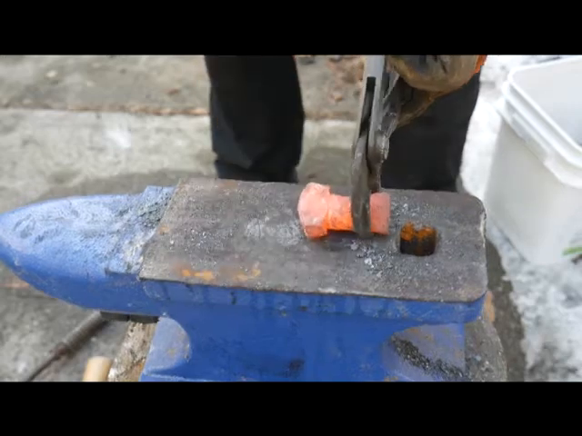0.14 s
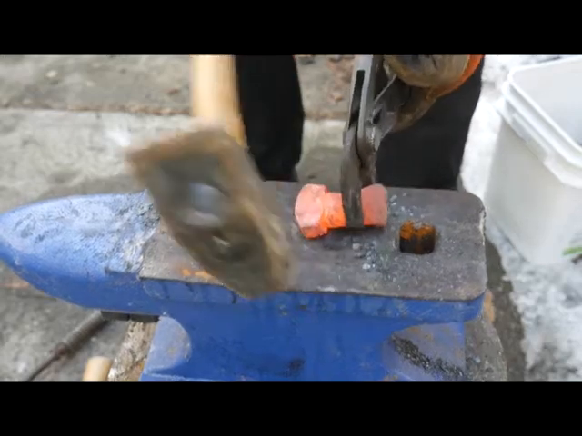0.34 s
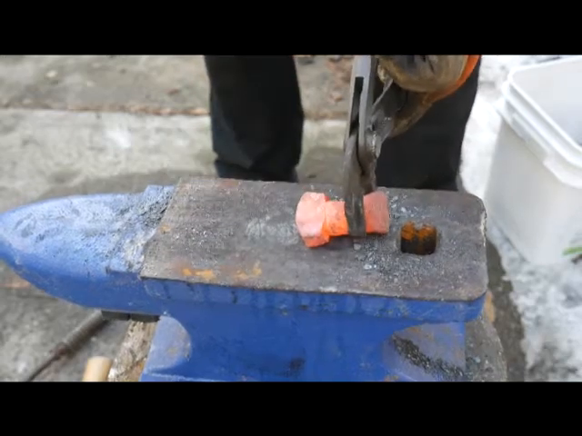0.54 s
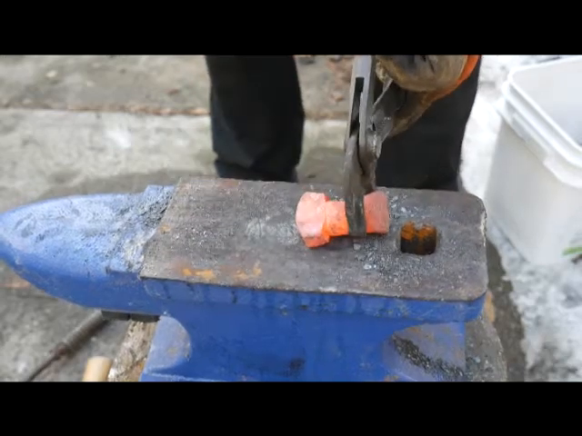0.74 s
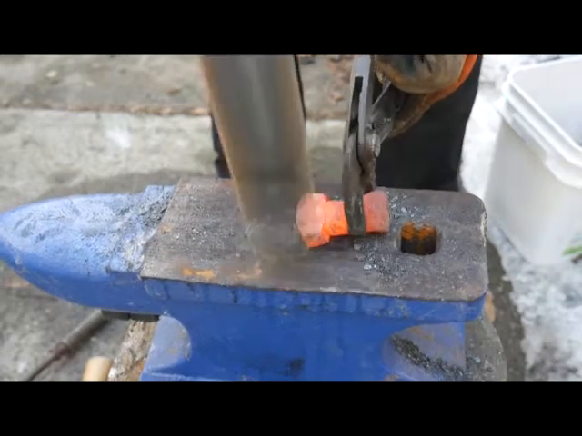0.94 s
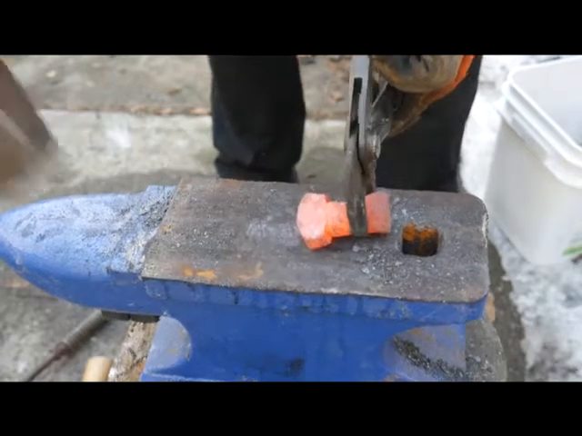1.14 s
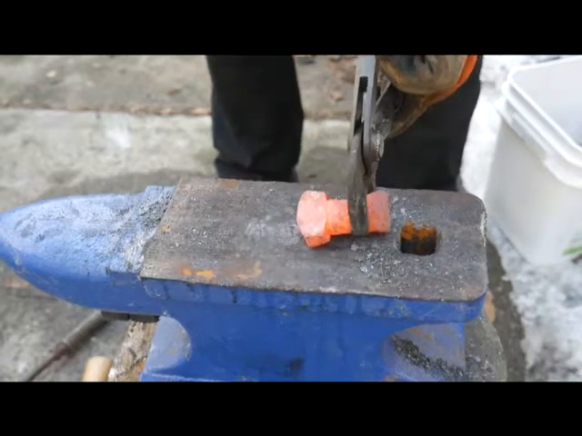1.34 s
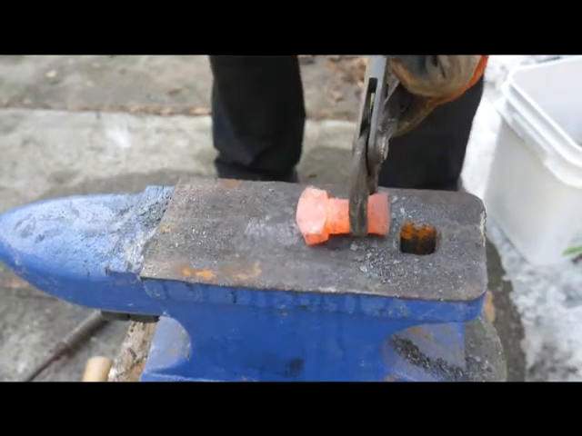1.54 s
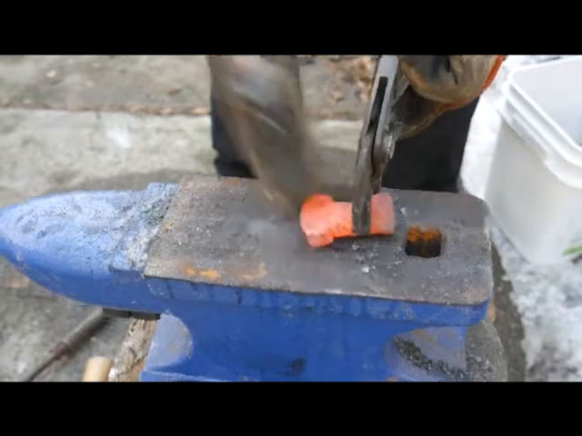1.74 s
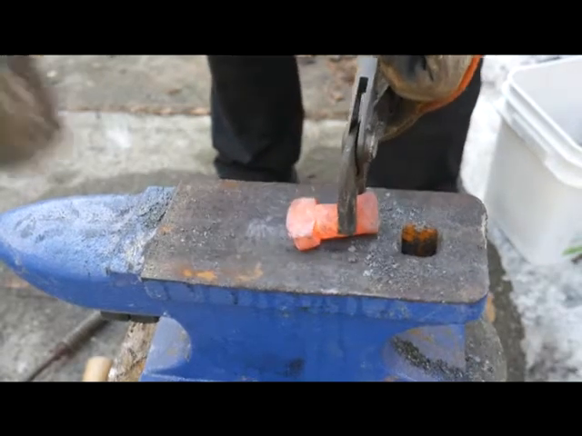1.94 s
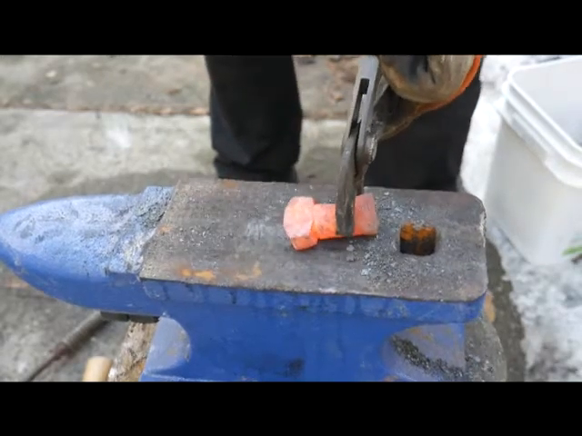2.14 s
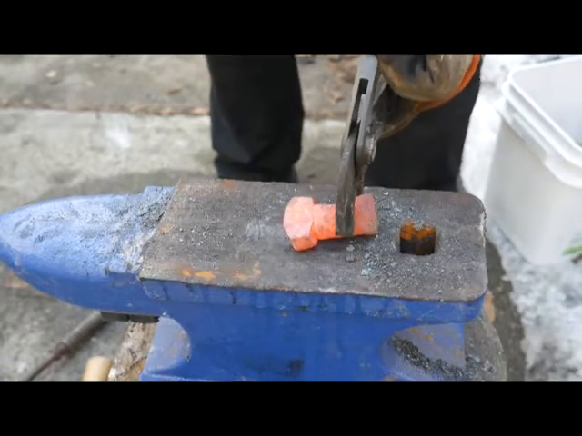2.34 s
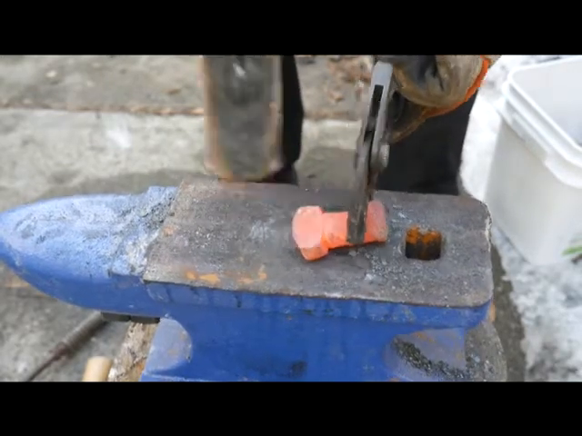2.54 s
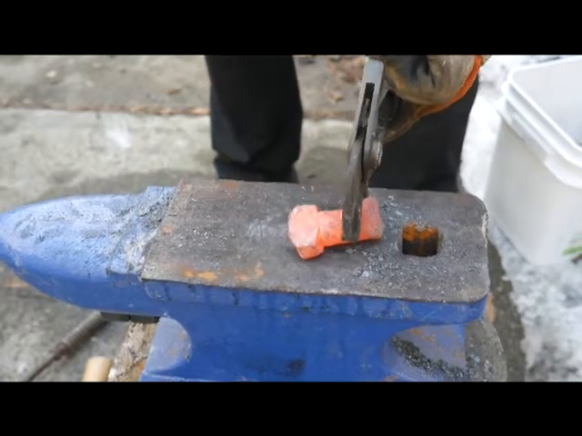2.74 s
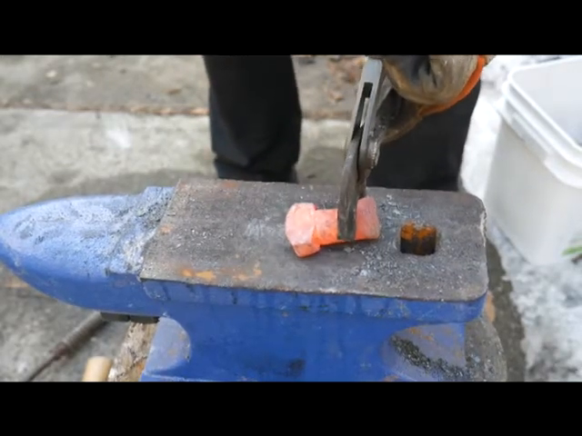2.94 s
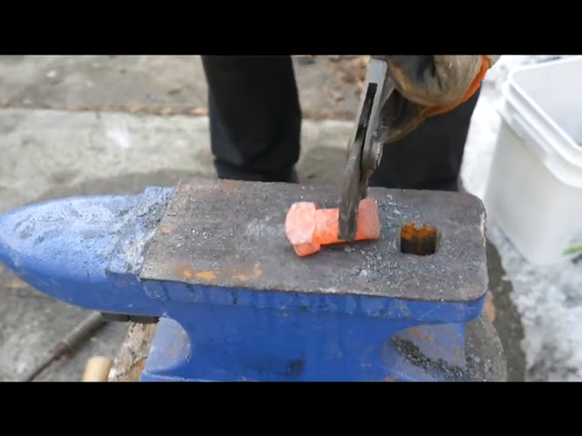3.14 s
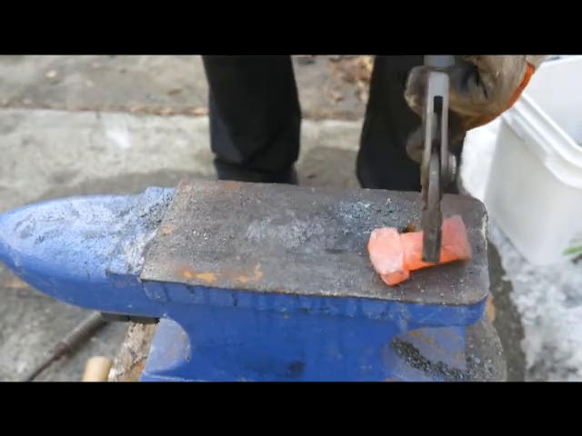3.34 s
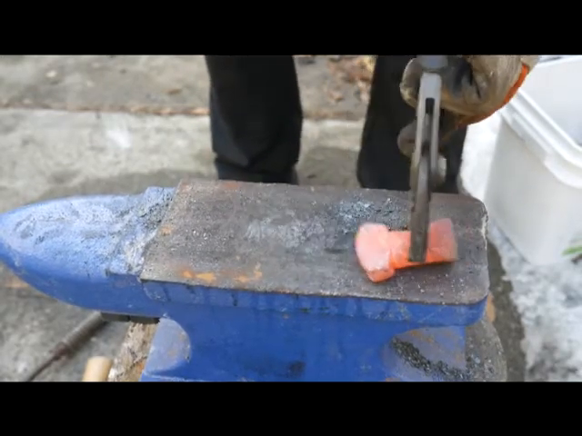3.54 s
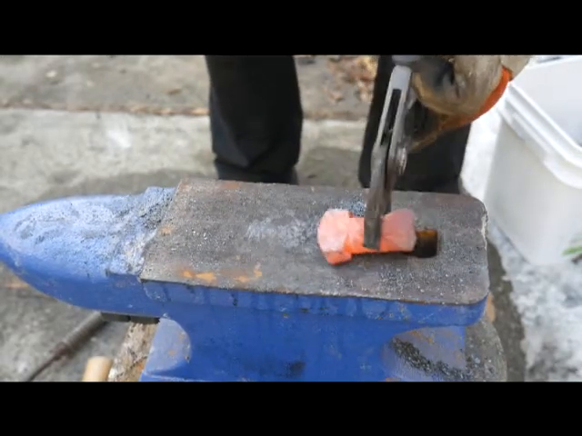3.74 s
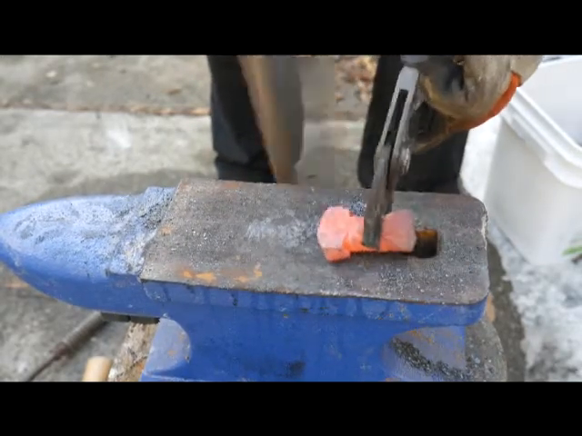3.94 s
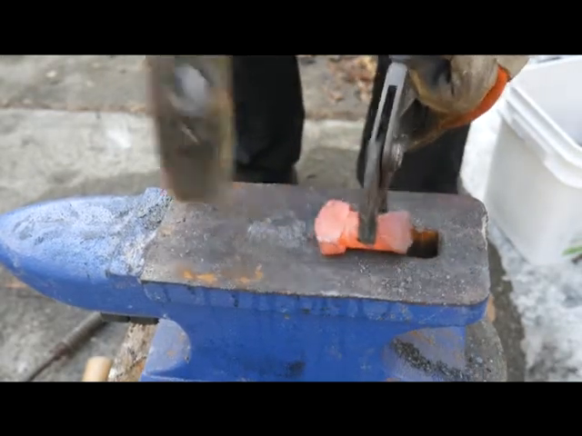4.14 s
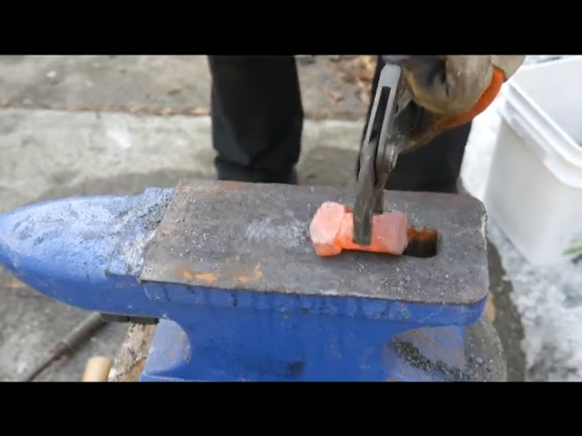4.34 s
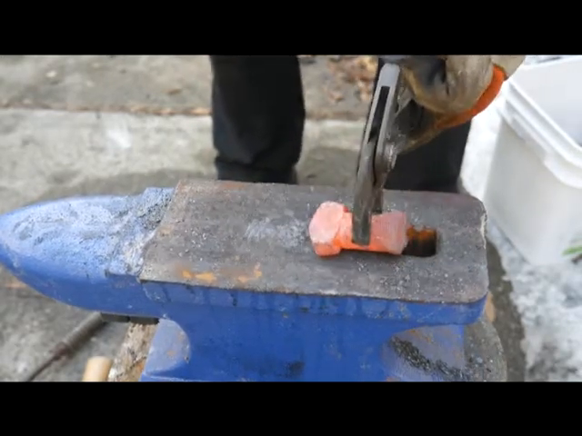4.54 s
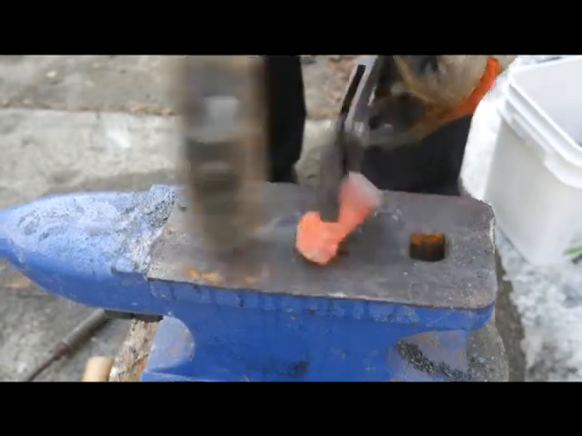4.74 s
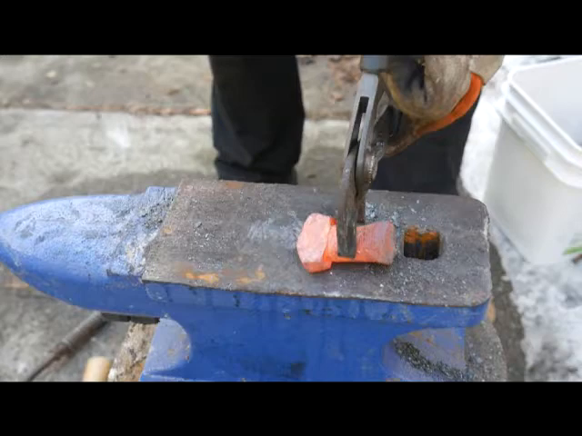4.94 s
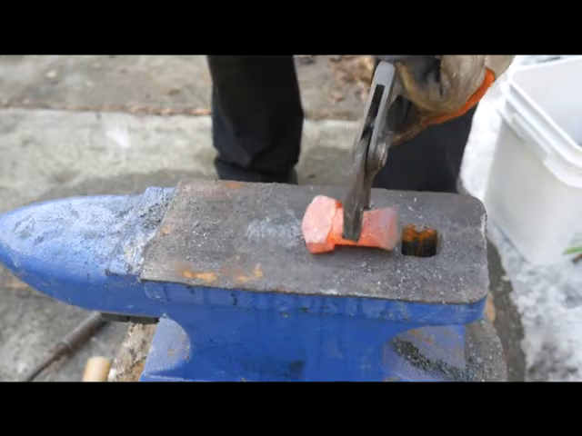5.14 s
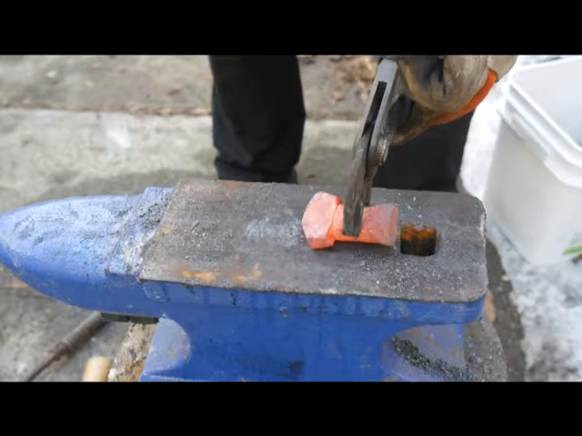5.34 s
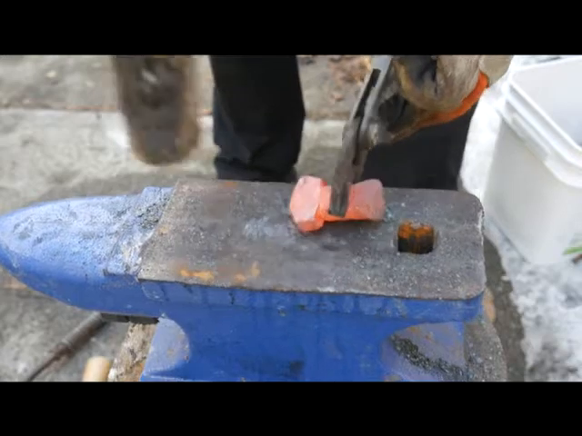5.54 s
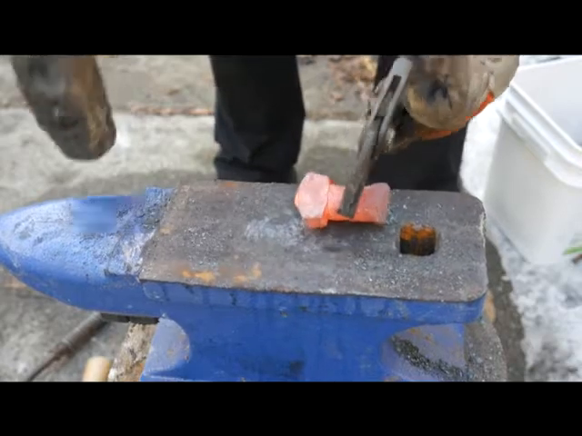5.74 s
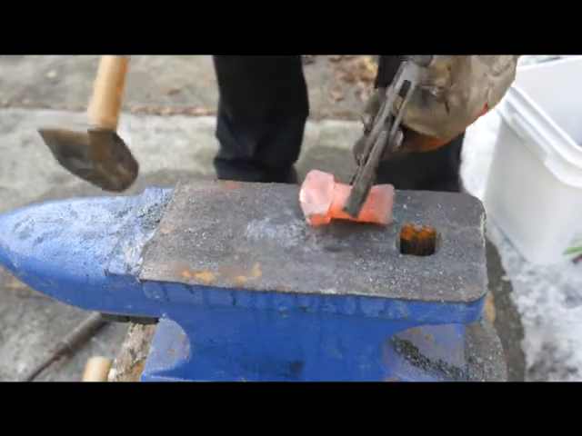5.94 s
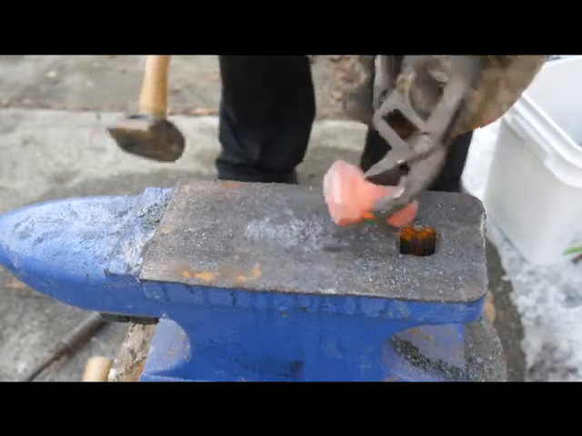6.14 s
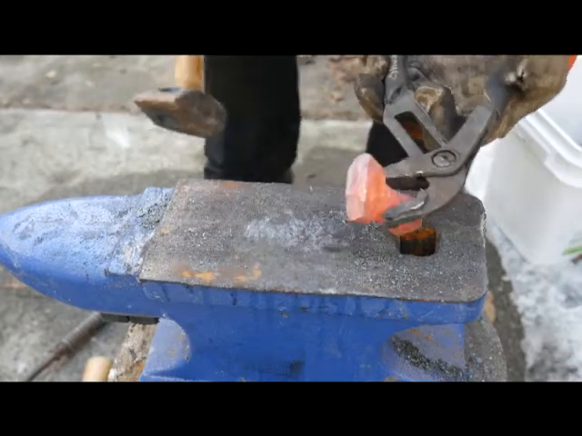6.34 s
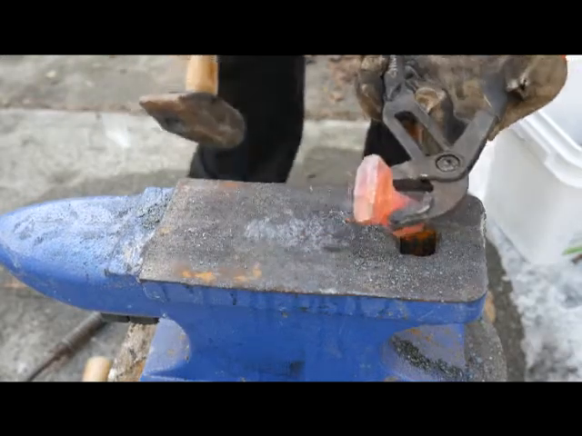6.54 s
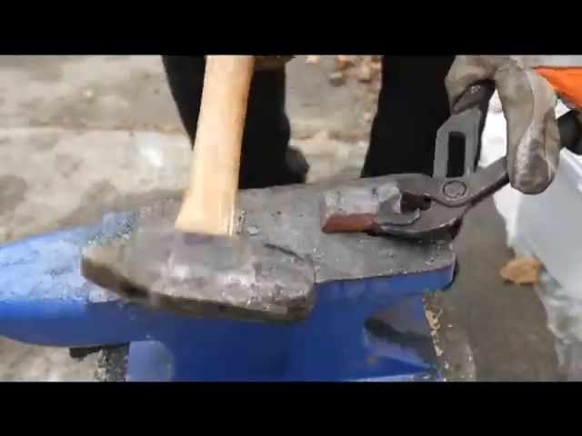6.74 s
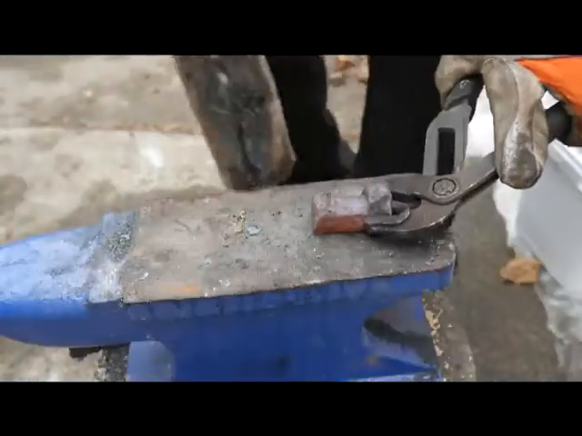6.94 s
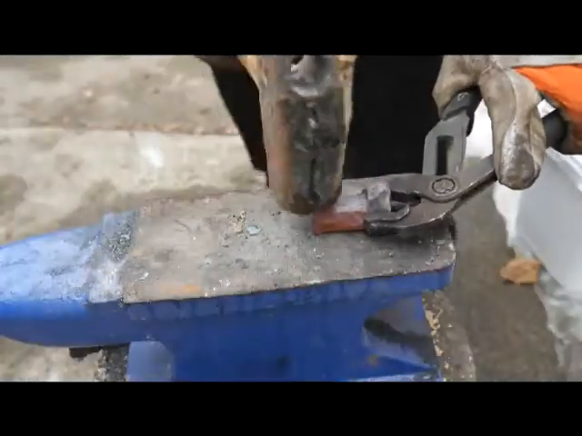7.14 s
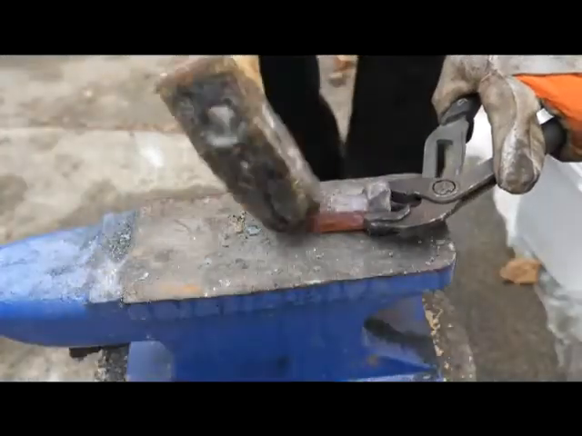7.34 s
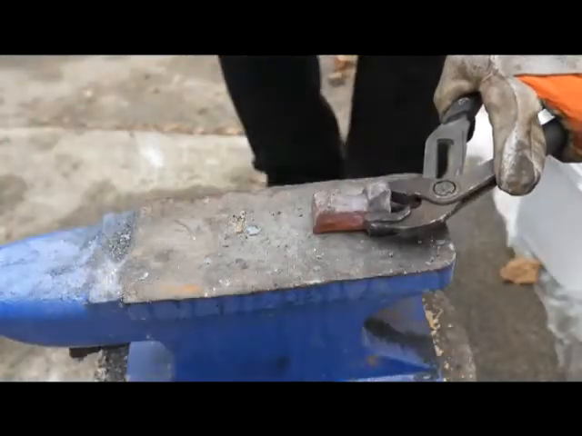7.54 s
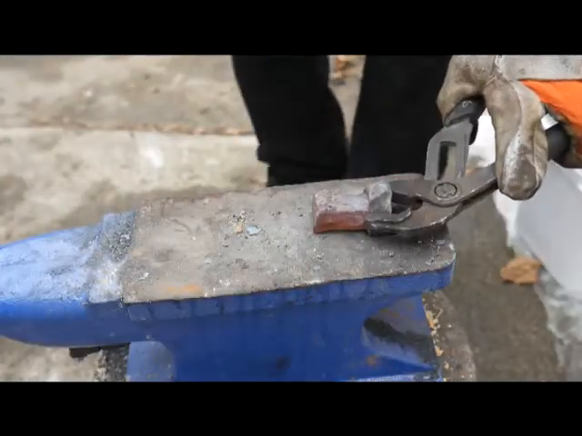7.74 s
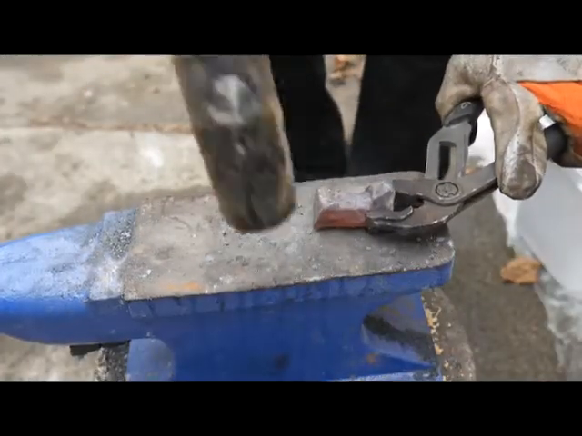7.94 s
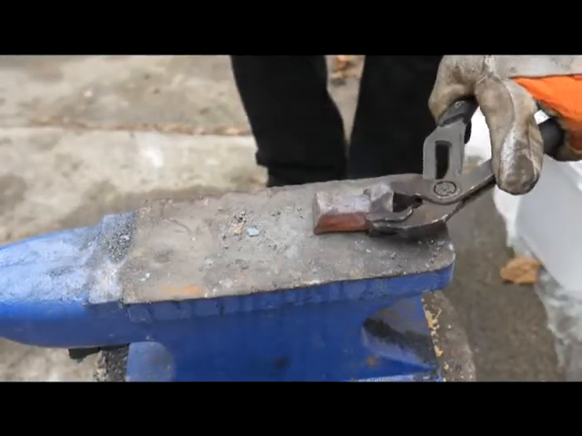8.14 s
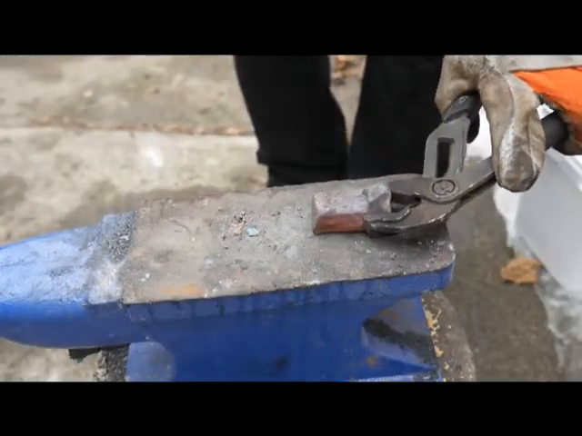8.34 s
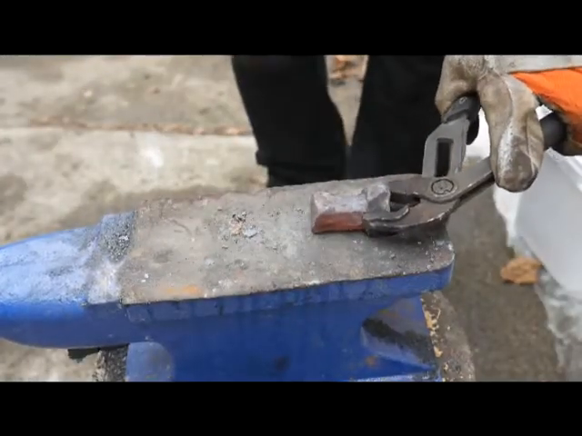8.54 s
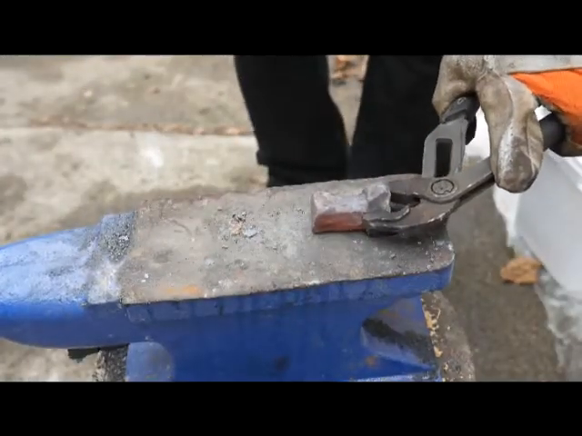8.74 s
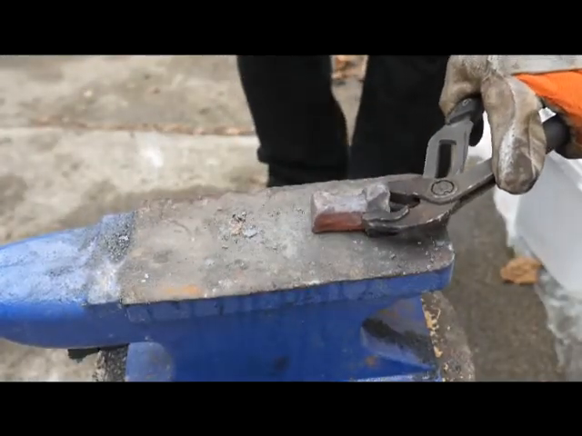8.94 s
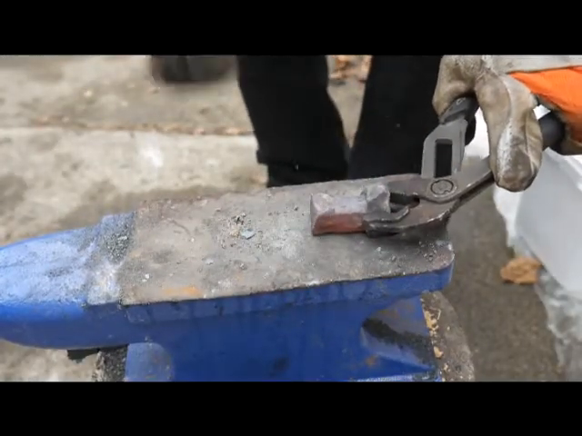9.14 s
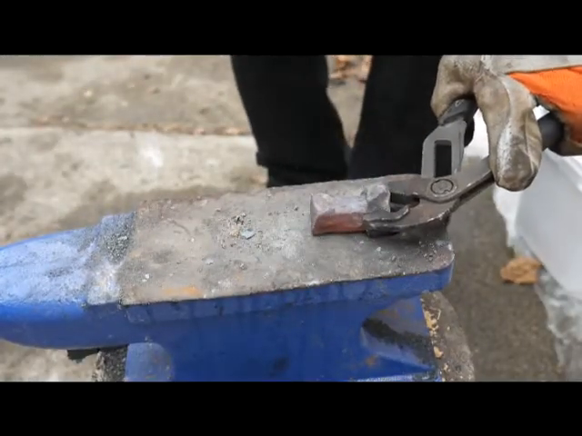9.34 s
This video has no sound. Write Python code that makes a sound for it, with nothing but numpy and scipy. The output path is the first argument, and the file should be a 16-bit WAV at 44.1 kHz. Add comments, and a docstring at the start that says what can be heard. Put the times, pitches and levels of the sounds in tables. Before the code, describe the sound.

Close, distorted hammering on a steel anvil in an open yard: evenly spaced punchy whacks with damped metallic clank over a barely audible rumble. After a quiet pause with small flake ticks and a faint tong squeak, the background jumps to a humming burner roar; metal scrapes and knocks, then three heavier, dull thuds briefly push the roar down.

```python
"""Hot bolt upset on an anvil

A smith upsets a red-hot bolt, held in tongs, on a steel anvil outdoors; the microphone is close and overloads.
Each blow sums a noise crack, a dispersed falling thud, short damped steel modes and a brief echo of the yard.
Tools knock, tick and scrape on the face: small cracks, filtered hiss and wandering narrow resonances. The
forge, shaped noise, rumbles behind; at 6.575 s the scene changes, and for the last, duller blows on the cooled
bolt the forge is much louder and hums."""
import sys
import numpy as np
from scipy import signal
from scipy.fft import rfft, irfft
from scipy.io import wavfile
from scipy.ndimage import uniform_filter1d, minimum_filter1d

SR = 44100
rng = np.random.default_rng(int(sys.argv[2]) if len(sys.argv) > 2 else 0)


def transcribe(u):
    """Save the signal u as a 16-bit wav file named by the first command-line argument.

    u: samples, shape (n,) or (channels, n), limited to [-1, 1]; the rate is SR.
    q: integer samples, one column per channel.
    """
    v = np.clip(np.atleast_2d(u).T, -1, 1)
    q = np.round(v * 32767).astype(np.int16)
    wavfile.write(sys.argv[1], SR, q)


N = 414540
TIME = np.arange(N) / SR

# Hammer blows, levels ahead of the limiter: t/s, thud/dB, thud tilt/(dB/octave), low knock/dB, punch/dB,
#   crack/dB, crack tilt/(dB/octave), anvil's lower tone/dB, main tone/dB, overtones/dB,
#   hammer ring/dB, its tilt/(dB/octave), ping/dB, bolt ring/dB, echo/dB, its tilt/(dB/octave)
BLOWS = [ (0.2011, 3.5, 3, -0.5, 3, -6, -1.5, -26, -29.5, -48, -45.5, 0, -41, -34.5, -20, -1.4),
         (0.914, 2, 2.5, 1, 2.5, -6.5, -0.5, -29, -36.5, -46, -49, 5, -22, -30, -21, -1),
         (1.6955, -5.5, -3.5, -8.5, -0.5, -3, 3.5, -45, -35, -50.5, -54.5, 4, -36.5, -29, -25, 0.6),
         (2.4450, -1, 4.5, 0, -1.5, -5, 2, -44.5, -28.5, -44, -46.5, 7, -41, -26, -21, 0),
         (3.184, -3.5, 3, -6.5, 2.5, 1.5, -2.5, -27, -26, -32, -50, 3.5, -39.5, -24, -21, 0.8),
         (3.9249, -3, 1, -2, -0.5, -7, 0.8, -33, -42.5, -46.5, -39.5, 3, -38.5, -27.5, -20.5, -0.2),
         (4.6727, 1, 0.5, -0.5, 3.5, -10.5, -3.5, -26.5, -31.5, -49.5, -43, -2.5, -28.5, -33, -18.5, -1.3),
         (5.3720, -1.5, -0.5, -1, -2, 0.5, -2, -29, -21, -32.5, -46.5, -1, -32.5, -23, -19.5, -0.4),
         (7.7957, 4, -0.5, 2, 0.5, -2, -6, -41.5, -42, -48, -41, -1.5, -41, -28, -21.5, -1.5),
         (8.3343, 1, -3.5, 1, 0.5, -11.5, 6, -43, -42, -55, -39, 2, -41, -23.5, -19.5, -1.2),
         (8.9328, 1.5, -2.5, 2, -2, -18.5, 7.5, -43, -42, -52, -49, 0, -47, -26, -20, -0.8), ]
# Modes around the anvil's main tone: f/Hz, level/dB, t60/s, after-ring level/dB
ANVIL_MODES = [(2010, -7, 0.11, -36), (2050, 2.5, 0.13, -28.5), (2160, -14.5, 0.06, -50),
               (2320, -12, 0.09, -46), (1050, -3, 0.04, -49.5)]
# Modes of the hammer head: f/Hz, level/dB, t60/s, after-ring level/dB
HAMMER_HEAD_MODES = [(3470, 1.5, 0.14, -18.5), (3300, -7.5, .12, -31), (4950, -6, .08, -38),
                     (5402, -0.5, 0.13, -25), (5600, -5, 0.12, -29), (6860, -8, .11, -34.5),
                     (8640, 1.5, 0.15, -27.5)]
# Chatter resonances of sliding steel: f/Hz, width/Hz, level/dB
CHATTER_BANDS = [(1300, 210, -1), (1726, 300, 6), (2250, 450, 2.5), (2950, 580, 3)]


def undb(db):
    """Amplitude ratio of a level: a factor of ten for every 20 dB."""
    return 10 ** (np.asarray(db) / 20)


def unit(x):
    """Normalization of the mean power: rms 1."""
    return x / np.sqrt(np.mean(x ** 2))


def fade(t, t60):
    """Exponential decay of a damped system, 60 dB down after t60 seconds."""
    return np.exp(-np.log(1000) * t / t60)


def curve(rows):
    """Linear interpolation of (t/s, value) rows over the whole scene."""
    return np.interp(TIME, *np.transpose(rows))


def response(points, size, tilt_db=0):
    """Frequency response: (f/Hz, level/dB) points joined over log frequency, tilted in dB/octave about 1 kHz."""
    hz = np.maximum(np.arange(size // 2 + 1) * SR / size, 1)
    at, db = np.transpose(points)
    octave = np.log2(np.clip(hz, 250, None) / 1000)  # the tilt stops growing below 250 Hz
    return hz, undb(np.interp(np.log(hz), np.log(at), db) + tilt_db * octave)


def noise(points, size, side_db, tilt_db=0, peaks_db=0, spacing_hz=150):
    """Spectral shaping of stereo noise to rms 1, with a random comb of small resonances and wider deepest bass."""
    hz, gain = response(points, size, tilt_db)
    comb = rng.standard_normal(1024)
    gain = gain * undb(peaks_db * np.interp(hz / spacing_hz, np.arange(len(comb)), comb))
    mid, side = rfft(rng.standard_normal((2, size))) * gain
    side = side * (undb(side_db) + .6 / (1 + (hz / 80) ** 4))
    return unit(irfft([mid + side, mid - side], size))


def walk(rate):
    """Low-pass random process: smoothed random steps, rate per second, with rms near 1."""
    hold = int(SR / rate)
    steps = np.repeat(rng.standard_normal(N // hold + 1), hold)
    return unit(uniform_filter1d(steps, hold)[:N])


def add(out, s, sound):
    """Superposition: mix a sound into out at time s."""
    i = int(s * SR)
    out[:, i:i + sound.shape[-1]] += sound[..., :N - i]


def dips(depth_db, recovery_s, onset_s=0.025):
    """Gain modulation in dB: a background drops after each blow and swells back."""
    age = np.maximum(TIME - np.array(BLOWS)[:, :1], 0)
    onset = 1 - np.exp(-age / onset_s)
    recovery = np.exp(-(age / recovery_s) ** 2)
    return depth_db * np.sum(onset * recovery, axis=0)


def forge(hum_hz=210, hum_db=-2.5, waver_hz=1.23):
    """Turbulent combustion noise; when it roars, the burner also sings one slightly wavering note."""
    # Spectra of the distant and the close forge: f/Hz, level/dB
    far_spectrum = [(15, -64), (25, -41.5), (125, -12), (146, -13.5), (167, -7), (196, -9.5), (224, -4),
                    (318, -2), (501, -11), (621, -5.5), (790, -19), (879, -16), (1810, -29), (11200, -50),
                    (15000, -72.5)]
    near_spectrum = [(25, -37.5), (60, -27), (110, -14.5), (170, -10.5), (250, 0), (330, 2), (420, -4.5),
                     (510, -6), (620, -5.5), (930, -16.5), (2100, -24.5), (4500, -37), (8000, -43),
                     (10200, -42.5), (15000, -59)]
    # Levels of the distant rumble and the close roar, before the dips: t/s, level/dB
    rumble_levels = [(0, -43), (2.5, -46), (5.9, -44.5), (6.55, -40)]
    roar_levels = [(6.57, -26.5), (7.8, -27), (8.5, -29), (9.4, -33)]
    # Dips of each after a blow: depth/dB, recovery/s
    rumble_dip = (-7.5, 0.32)
    roar_dip = (-23.5, 0.22)
    roar_start_s, crossfade_s = 6.575, 0.0031

    loud = np.clip((TIME - roar_start_s) / crossfade_s, 0, 1)
    flutter, throb = undb(1.1 * walk(25)), undb(1.1 * walk(15))

    rumble = noise(far_spectrum, N, side_db=-7.5, peaks_db=1.3, spacing_hz=34.2) * flutter
    rumble = rumble * undb(curve(rumble_levels) + dips(*rumble_dip))

    flame = noise(near_spectrum, N, side_db=-7.0, peaks_db=2.1, spacing_hz=35.5) * flutter
    hum_phase = 2 * np.pi * np.cumsum(hum_hz + waver_hz * walk(12)) / SR
    hum = unit(np.sin(hum_phase) * throb)
    roar = (flame + undb(hum_db) * hum) * undb(curve(roar_levels) + dips(*roar_dip))

    # both lean slightly to the left
    lean = np.array([[1], [-1]])
    return (1 - loud) * rumble * undb(0.7 * lean) + loud * roar * undb(0.95 * lean)


def thud(t, tilt_db, knock_db=0, punch_db=0, lag_s=0.0052, knee_hz=300, yield_s=0.0005):
    """Dispersion of a push into the yielding bolt: lows lag highs, so the pulse falls in pitch in milliseconds."""
    # Spectrum of the push: f/Hz, level/dB
    thud_spectrum = [(20, -41), (45, -24.5), (90, -19.5), (170, -7.5), (250, -2.5), (400, 7), (480, 4),
                     (600, -10), (720, 3.5), (950, 6), (1200, 2.5), (1600, -2), (2100, -13.5),
                     (3000, -28.5), (8000, -39)]
    knock_hz, knock_octaves = 400, 0.47  # low resonance: centre and width
    punch_hz, punch_octaves = 1060, 0.45  # upper resonance: centre and width

    hz, gain = response(thud_spectrum, len(t), tilt_db)
    gain = gain * undb(knock_db * np.exp(-(np.log2(hz / knock_hz) / knock_octaves) ** 2))
    gain = gain * undb(punch_db * np.exp(-(np.log2(hz / punch_hz) / punch_octaves) ** 2))
    # the folded cepstrum makes the pulse causal
    fold = 1 + np.sign(t) * np.sign(t[-1] / 2 - t)
    causal = rfft(irfft(np.log(gain)) * fold)
    # this phase gives a group delay that shrinks as frequency rises
    lag_phase = 2 * np.pi * (lag_s * knee_hz * np.log1p(hz / knee_hz) + yield_s * hz)
    pulse = irfft(np.exp(causal - 1j * lag_phase)) * fade(t, 0.18)
    return pulse / np.abs(pulse).max()


def stand(t, hz=164, t60=.3, db=-38):
    """Mass on a spring: the anvil bounces on its stand with a low, damped boom."""
    return undb(db) * np.sin(2 * np.pi * hz * t) * fade(t, t60) * (1 - np.exp(-t / 0.0044))


def crack(t, tilt_db, crush_s=0.0023, hiss=0.19, t60=0.031):
    """Brittle fracture: scale shatters in a noise burst while the faces close, then a hiss dies quickly."""
    # Spectrum of shattering scale: f/Hz, level/dB
    crack_spectrum = [(300, -24), (1200, 1), (2300, 2), (4000, -2.5), (6500, 2), (7900, -4), (9200, 5.5),
                      (12000, -6), (14500, -9.5), (16500, -16.5)]
    shatter = noise(crack_spectrum, len(t), side_db=-17.5, tilt_db=tilt_db, peaks_db=3.0, spacing_hz=442)
    return shatter * (np.exp(-(t / crush_s) ** 2) + hiss * fade(t, t60))


def ring(t, modes, tilt_db, free_t60, scatter_db=1.3, shimmer=0.2, shimmer_hz=60, detune=0):
    """Modal superposition: steel damped hard under the blow, then singing on faintly, a little different each time."""
    hz, db, t60, free_db = np.transpose(modes)[:, :, None]
    size, phase, pan, shift = rng.standard_normal((4, len(modes), 1))
    gain = undb(scatter_db * size + tilt_db * np.log2(hz / hz[0]))
    decay = undb(db) * fade(t, t60) + undb(free_db) * fade(t, free_t60)

    # the bolt trembling on the face roughens each partial
    chance = rng.standard_normal((len(modes), 128, 2)) @ [1, 1j]
    wander = np.array([np.interp(t * shimmer_hz, np.arange(len(c)), c) for c in chance])
    tremble = 1 + shimmer * wander

    carrier = np.exp(2j * np.pi * (hz * (1 + detune * shift) * t + phase))
    partials = gain * decay / np.hypot(1, shimmer) * np.imag(tremble * carrier)
    return np.array([np.sum(partials * (1 + way * .2 * pan), axis=0) for way in (1, -1)])


def yard(t, tilt_db, near_t60=0.13, far_t60=0.64, far_db=-22):
    """Diffuse reflection: near walls answer with a quick metallic clatter, far ones with a faint, duller tail."""
    # Spectrum of the yard's answer: f/Hz, level/dB
    yard_spectrum = [(40, -19.5), (170, 12), (500, 10.5), (750, 7.5), (1100, 2.5), (2200, 4.5),
                     (3000, -0.5), (7500, -4), (9500, -2), (11500, -8.5), (13000, -18.5), (15500, -23.5)]
    near = noise(yard_spectrum, len(t), side_db=-6.5, tilt_db=tilt_db, peaks_db=3.0, spacing_hz=110.8)
    far = noise(yard_spectrum, len(t), side_db=-6.0, tilt_db=tilt_db - 0.27, peaks_db=3.2, spacing_hz=73.0)
    tail = near * fade(t, near_t60) + undb(far_db) * far * fade(t, far_t60)
    return tail * (1 - np.exp(-t / 0.0011))


def hammer():
    """Impact excitation: each blow snaps, thuds, cracks and rings the steels; ground, yard and walls reflect it."""
    # Modes, each f/Hz, level/dB, t60/s, after-ring level/dB:
    # dull modes of the anvil and its stand that every blow's thud wakes
    body_modes = [(558, -29.5, .1, -70), (1485, -37, 0.083, -72), (2410, -39.5, .11, -72)]
    # the anvil's lower tone, which beats against the main one
    anvil_low_modes = [(1956, 0.5, 0.13, -30.5)]
    # the anvil's rough overtones
    anvil_high_modes = [(4055, -2, 0.14, -19.5), (4160, 0, 0.13, -22), (4290, -5, 0.1, -26)]
    # a thin, high ping of the steel that only some blows wake fully
    ping_modes = [(9588, 0.5, 0.11, -34), (7610, -11.5, 0.079, -42)]
    # the bolt in the tongs
    bolt_modes = [(9120, -3, 0.045, -36), (9700, -6, 0.05, -38), (9960, -6.5, 0.1, -34),
                  (10100, -3, 0.054, -38), (10880, -19.5, 0.06, -50.5)]
    # Distant walls return the anvil's ring and the yard's clatter: delay/s, ring/dB, clatter/dB
    far_walls = [(0.115, -33.5, -35), (0.175, -32.5, -42), (0.217, -28, -35.5), (0.248, -33.5, -40)]
    far_smear_s = 0.008  # a distant wall's answer swells in softly
    snap_lead_s, snap_db = 0.0005, -8.5  # the first touch snaps just ahead of the blow
    ground_s, ground_db = 0.0054, -20.5  # reflection from the ground

    out, t = np.zeros((2, N)), np.arange(24000) / SR
    for (s, thud_db, thud_tilt, knock_db, punch_db, crack_db, crack_tilt, low_db, main_db, high_db,
         head_db, head_tilt, ping_db, bolt_db, echo_db, echo_tilt) in BLOWS:
        push = undb(thud_db) * (thud(t, thud_tilt, knock_db, punch_db) + stand(t))
        contact = push + undb(crack_db) * crack(t, crack_tilt)
        body = undb(thud_db) * ring(t, body_modes, 0, free_t60=0.4, shimmer=0.17)
        anvil = (undb(low_db) * ring(t, anvil_low_modes, 0, free_t60=0.7, shimmer=0.35)
                 + undb(main_db) * ring(t, ANVIL_MODES, 0, free_t60=0.7, shimmer=0.66)
                 + undb(high_db) * ring(t, anvil_high_modes, 0, free_t60=0.44, shimmer=0.8, shimmer_hz=130))
        head = undb(head_db) * ring(t, HAMMER_HEAD_MODES, head_tilt, free_t60=0.55, shimmer=0.4, shimmer_hz=90)
        ping = undb(ping_db) * ring(t, ping_modes, 0, free_t60=.45)
        bolt = undb(bolt_db) * ring(t, bolt_modes, 0, free_t60=0.5, scatter_db=2.0,
                                    shimmer=1.2, shimmer_hz=220, detune=0.0069)
        echo = undb(echo_db) * yard(t, echo_tilt)
        snap = undb(snap_db) * crack(t, tilt_db=-0.75, crush_s=0.0013, hiss=0)

        add(out, s - snap_lead_s, snap)
        add(out, s, contact + body + anvil + head + ping + bolt + echo)
        # the ground's reflection is weaker on the right
        add(out, s + ground_s, undb(ground_db) * contact * np.array([[1], [.6]]))
        for delay_s, ring_db, clatter_db in far_walls:
            far = undb(ring_db) * anvil + undb(clatter_db) * echo
            add(out, s + delay_s, far * (1 - np.exp(-t / far_smear_s)))
    return out


def narrow_band(hz, width_hz, drift):
    """Amplitude modulation: a random envelope spreads a sine into a narrow noise band whose centre wanders."""
    phase = 2 * np.pi * np.cumsum(hz * (1 + drift * walk(22))) / SR
    return walk(width_hz) * np.sin(phase)


def grit(per_s=260, spread_db=2.0, t60=0.016):
    """Impulse response excitation: grains of scale give way one by one and briefly ring the sliding steel."""
    out, t = 0, np.arange(2048) / SR
    for hz, _, db in CHATTER_BANDS:
        sizes = undb(spread_db * np.minimum(rng.exponential(size=N), 3))
        grains = (rng.random(N) < per_s / SR) * sizes
        resonance = np.sin(2 * np.pi * hz * t) * fade(t, t60)
        out = out + undb(db) * signal.fftconvolve(grains, resonance)[:N]
    return unit(out)


def scrapes(grit_db=3, slip_db=6.5, drift=.025, squeak_hz=5800, squeak_width_hz=650):
    """Stick-slip friction: tools drag over scale with gritty hiss, catching resonances and one thin squeak."""
    # Spectrum of the hiss: f/Hz, level/dB
    hiss_spectrum = [(200, -44), (700, 7.5), (2500, 2.5), (5000, -2), (10000, -6.5), (15500, -18.5)]
    # Steel sliding over loose scale: t/s, rise/s, fall/s, hiss/dB, chatter/dB
    strokes = [(1.27, 0.13, 0.12, -60.5, -73.5), (3.51, 0.085, 0.1, -56, -72), (5.9, .37, 0.18, -58, -67),
               (6.281, 0.19, 0.3, -55, -65), (6.665, 0.11, 0.14, -28.5, -36), (6.82, 0.078, 0.68, -45, -44),
               (7.133, 0.016, 0.095, -23.5, -28.5), (7.52, 0.058, .15, -57, -60),
               (8.58, 0.057, 0.12, -45, -65)]
    # The tongs squeak faintly as they turn: t/s, level/dB
    squeak_levels = [(6.28, -85), (6.35, -68.5), (6.48, -58), (6.57, -68)]
    grains_db = -5  # crushed grains, relative to the chatter

    hiss = unit(noise(hiss_spectrum, N, side_db=-5.5, peaks_db=1.5) * undb(grit_db * walk(700)))
    chatter = unit(sum(undb(db + slip_db * walk(45)) * narrow_band(hz, width, drift)
                       for hz, width, db in CHATTER_BANDS))
    chatter = unit(chatter + undb(grains_db) * grit())
    squeaking = undb(curve(squeak_levels)) * (TIME < squeak_levels[-1][0])
    out = squeaking * narrow_band(squeak_hz, squeak_width_hz, drift)
    for s, rise, fall, hiss_db, chatter_db in strokes:
        pressure = np.interp(TIME, [s, s + rise, s + rise + fall], [0, 1, 0]) ** 2
        out = out + pressure * (undb(hiss_db) * hiss + undb(chatter_db) * chatter)
    return out


def ticks(tilt_db=-3.0):
    """Brittle fracture on a small scale: flakes crunch with a soft crack."""
    # Flakes of scale ticking under the tongs: t/s, level/dB
    flakes = [(2.075, -60.5), (4.215, -57.5), (5.322, -61.5), (5.334, -53.5), (6.009, -59), (6.118, -53.5),
              (6.265, -52.5)]
    out, t = np.zeros((2, N)), np.arange(4096) / SR
    for s, db in flakes:
        add(out, s, undb(db) * crack(t, tilt_db, crush_s=0.0029, hiss=0.38, t60=.05))
    return out


def knocks():
    """Weak impact excitation: tools set down give a dull thud and a click that barely wakes steel and yard."""
    # Light knocks of tongs, bolt and resting hammer: t/s, thud/dB, click/dB, click tilt/(dB/octave)
    touches = [(4.748, -23.5, -66, -5), (4.7993, -43, -30, -4), (5.435, -50, -35, -6.5),
               (6.5752, -19.5, -28.5, -6), (6.691, -18, -26, -9), (6.851, -39, -31, -9),
               (7.0804, -19, -16, -5), (7.0843, -3, -20, -1.5)]
    thud_tilt = -11.5  # dB per octave
    ring_db, echo_db = -23.5, -16  # relative to the click

    out, t = np.zeros((2, N)), np.arange(24000) / SR
    for s, thud_db, click_db, click_tilt in touches:
        steel = undb(ring_db) * ring(t, ANVIL_MODES + HAMMER_HEAD_MODES, tilt_db=-6.0, free_t60=.5)
        click = crack(t, click_tilt) + steel + undb(echo_db) * yard(t, tilt_db=-1.5)
        push = undb(thud_db) * (thud(t, thud_tilt) + stand(t))
        add(out, s, push + undb(click_db) * click)
    return out


def scene():
    """Superposition of forge, hammer, sliding tools, scale and knocking tools."""
    return forge() + hammer() + scrapes() + ticks() + knocks()


def record(dry, ceiling_db=2.5, low_cut_hz=35, top_hz=15900):
    """Limiting and saturation: a fast limiter holds blows down, the rest overloads; deepest bass and top are cut."""
    room = np.minimum(1, undb(ceiling_db) / (np.abs(dry).max(axis=0) + 1e-9))
    held = dry * uniform_filter1d(minimum_filter1d(room, size=65), size=65)
    clipped = held / (1 + held ** 8) ** (1 / 8)
    low_cut = signal.butter(1, low_cut_hz, "high", fs=SR, output="sos")
    top_cut = signal.ellip(8, .2, 70, top_hz, fs=SR, output="sos")
    return signal.sosfilt(top_cut, signal.sosfilt(low_cut, clipped))


dry = scene()
out = record(dry)
transcribe(out)
```